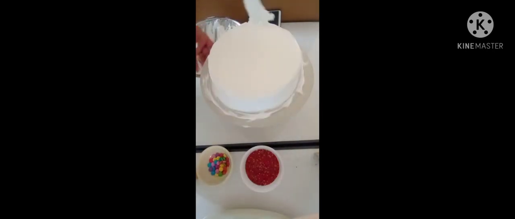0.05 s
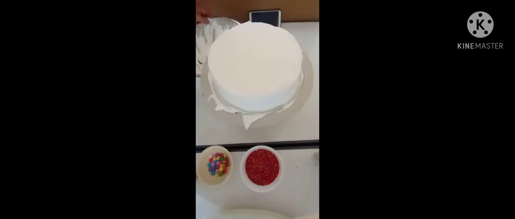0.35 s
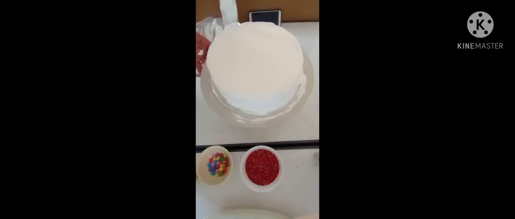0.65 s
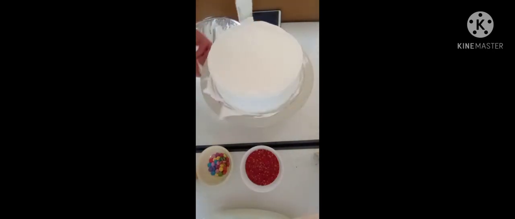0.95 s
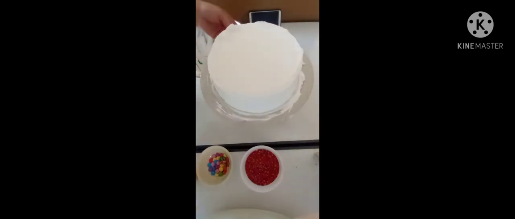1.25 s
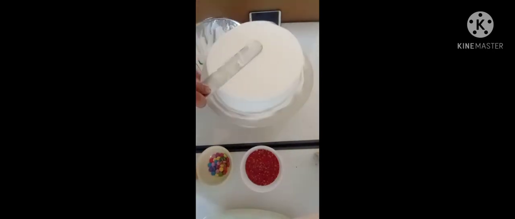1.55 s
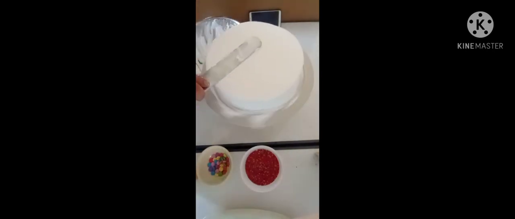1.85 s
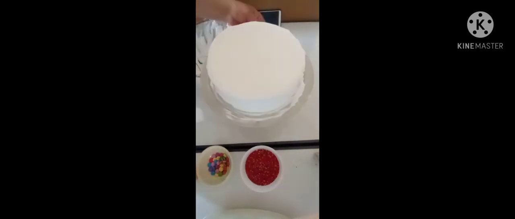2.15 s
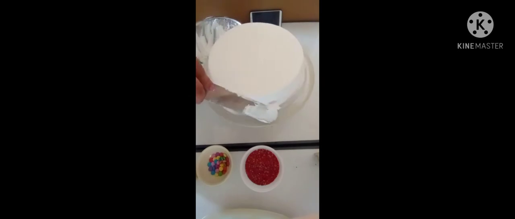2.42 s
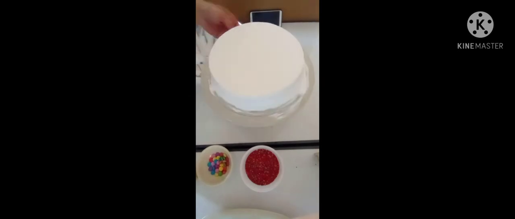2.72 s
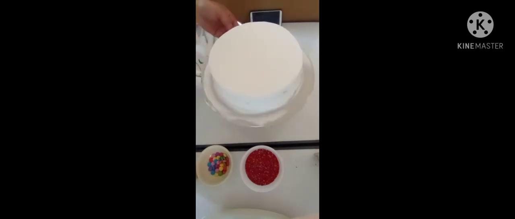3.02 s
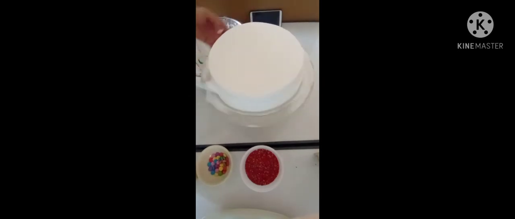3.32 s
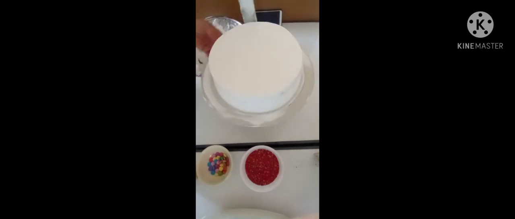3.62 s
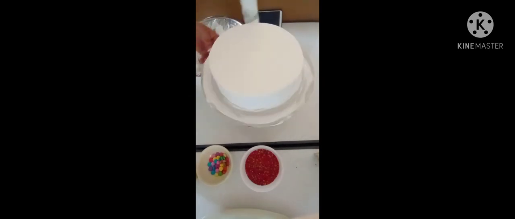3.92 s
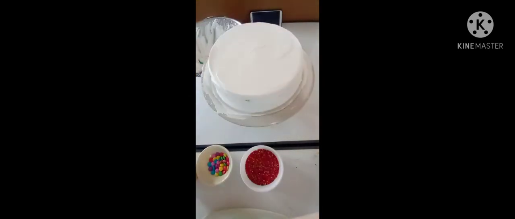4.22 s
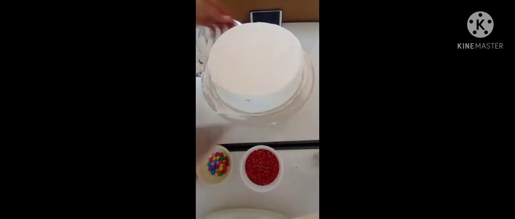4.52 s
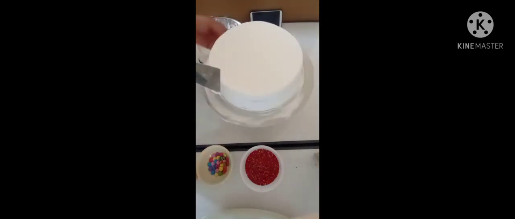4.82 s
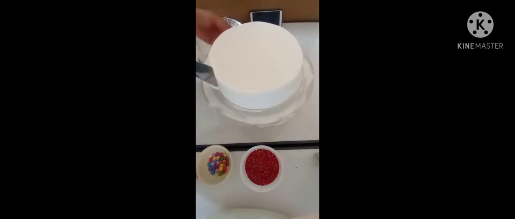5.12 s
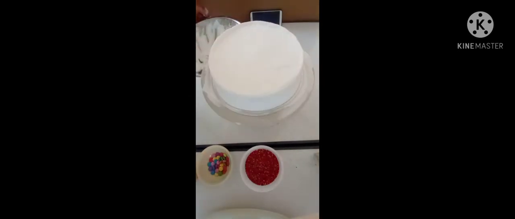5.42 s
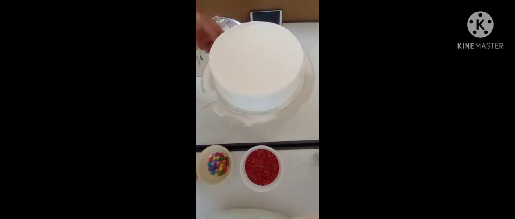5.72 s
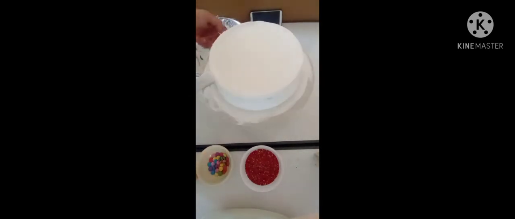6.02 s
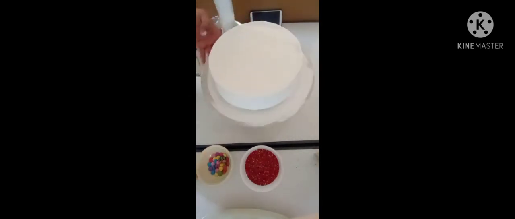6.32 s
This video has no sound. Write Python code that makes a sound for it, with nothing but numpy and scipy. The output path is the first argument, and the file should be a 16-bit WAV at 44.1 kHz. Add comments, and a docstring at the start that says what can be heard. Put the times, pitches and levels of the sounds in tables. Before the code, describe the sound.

Close to the microphone on a kitchen worktop, a metal spatula rubs and scrapes through cream, with light, irregular clicks against the cake plate and tiny squeaks. A quick run of dull knocks comes from the turning plate, then a short swish of foil. A longer, faintly singing scrape leads to a cluster of louder taps and some final scrapes. An appliance motor hums underneath the whole time.

```python
"""A kitchen appliance hums throughout while a steel spatula smooths cream on a cake turned by hand.
From the start the blade drags in tiny sticks and slips, with a brief squeak now and then,
and soon edges begin to tap the plate. At about 2.3 s the plate judders on its stand,
and near 2.9 s fingers brush some foil. From 4.6 s a scraper sings through one long pull;
a few more taps, strokes and squeaks end the scene."""
import sys
import numpy as np
from scipy import signal
from scipy.fft import rfft, irfft
from scipy.io import wavfile
from scipy.ndimage import uniform_filter1d

SR = 44100
rng = np.random.default_rng(int(sys.argv[2]) if len(sys.argv) > 2 else 0)


def transcribe(u):
    """Save the signal u as a 16-bit wav file named by the first command-line argument.

    u: samples, shape (n,) or (channels, n), limited to [-1, 1]; the rate is SR.
    q: integer samples, one column per channel.
    """
    v = np.clip(np.atleast_2d(u).T, -1, 1)
    q = np.round(v * 32767).astype(np.int16)
    wavfile.write(sys.argv[1], SR, q)


N = 289296
T = np.arange(N) / SR


def undb(db):
    """Turn decibels into a number to multiply by."""
    return 10 ** (np.asarray(db) / 20)


def unit(x):
    """Scale a sound to an average (rms) level of 1."""
    return x / np.sqrt(np.mean(x ** 2))


def wander(rate):
    """A smooth random drift, about 1 in size, that finds a new value `rate` times a second."""
    hold = max(int(SR / rate), 2)
    steps = np.repeat(rng.standard_normal(N // hold + 1), hold)
    return 1.25 * uniform_filter1d(uniform_filter1d(steps, hold), hold)[:N]


def band(x, lo_hz, hi_hz):
    """Keep the part of a sound between two pitches."""
    sos = signal.butter(3, [lo_hz, min(hi_hz, .48 * SR)], "band", fs=SR, output="sos")
    return signal.sosfilt(sos, x)


def ring(force, modes):
    """A force makes an object ring at its own pitches (modes); narrow ones ring longer."""
    return sum(undb(db) * signal.lfilter(*signal.iirpeak(hz, hz / width, fs=SR), force)
               for hz, width, db in modes)


def add(out, start_s, x):
    """Mix x into out at the given time."""
    start = max(int(start_s * SR), 0)
    out[start:start + len(x)] += x[:N - start]


# The motor's tones. Each row: pitch in Hz, level in dB.
MOTOR_TONES = [(394.9, -73), (801.5, -72), (924.6, -71.5), (1014, -81.5), (2369.6, -68.5), (2404, -65),
               (2766, -97), (3949.5, -76), (4344, -85), (4739, -72.5), (9873, -86), (10266, -88.5)]
# The rush of air before the housing colours it. Each row: pitch in Hz, level in dB per Hz.
AIR_RUSH = [(30, -115), (130, -116), (330, -114), (470, -107), (540, -100), (730, -100), (850, -97),
            (1100, -94.5), (1350, -102), (2100, -101), (2600, -99), (5000, -103), (7500, -108),
            (11000, -111), (15000, -120)]
# Where the housing lifts or lowers the rush. Each row: pitch in Hz, width in Hz, lift in dB.
HOUSING_MODES = [(547.6, 44, 10.5), (640, 43, 8), (860, 44, 4), (1040, 45, -0.5), (1180, 190, 0.5),
                 (1495, 10, 13.5), (1650, 49, -16), (1845, 110, 8.5), (2230, 180, 1), (2874, 180, 7.5),
                 (3500, 340, 1.5), (3970, 100, 4.5), (4650, 220, 2), (4900, 110, 0), (5500, 300, -1.5),
                 (5800, 310, 6.5), (6500, 180, 5.5)]


def appliance(waver_hz=2.117, flicker_db=1.0, swell_db=-0.17):
    """Motor tones waver a little in pitch and level, over a rush of air coloured by the housing."""
    tones = 0
    for hz, db in MOTOR_TONES:
        pitch = hz + waver_hz * np.sqrt(hz / 2400) * wander(25.01)
        peak = np.sqrt(2) * undb(db + flicker_db * wander(9))
        tones = tones + peak * np.sin(2 * np.pi * np.cumsum(pitch) / SR)
    air_hz, air_db = np.transpose(AIR_RUSH)
    freqs = np.maximum(np.arange(N // 2 + 1) * SR / N, 1)
    lift_db = sum(db / (1 + (2 * (freqs - hz) / width) ** 2) for hz, width, db in HOUSING_MODES)
    colour = undb(np.interp(np.log(freqs), np.log(air_hz), air_db) + lift_db) * np.sqrt(SR / 2)
    air = irfft(rfft(rng.standard_normal(N)) * colour, N)
    return tones + air * undb(swell_db * wander(5.57))


def pressure(start_s, length_s, swell_db, attack_s=0.017, release_s=0.06):
    """One movement of the hand: it presses on, leans in or eases off evenly, and lets go."""
    t = T - start_s
    touch = np.clip(t / attack_s, 0, 1) * np.clip(1 - (t - length_s) / release_s, 0, 1) ** 2
    return touch * undb(swell_db * (np.clip(t / length_s, 0, 1) - .5))


def friction(slips_per_s, spread_db, smooth_db, flutter_db):
    """An edge sticks and slips: tiny random jerks over a smooth rub, under a trembling hand."""
    slips = (rng.random(N) < slips_per_s / SR) * rng.standard_normal(N)
    slips *= undb(spread_db * np.minimum(rng.exponential(size=N), 4))
    smooth = undb(smooth_db) * rng.standard_normal(N)
    return (unit(slips) + smooth) * undb(flutter_db * wander(70))


def cream_pops(pops_per_s=34, jitter=.35, spread_db=3.5, fade_s=0.053):
    """Sticky cream catches the spatula and lets go in a loose row of small, uneven pops."""
    t = np.arange(SR // 10) / SR
    gaps, sizes = np.clip(rng.standard_normal((600, 2)), -2, 2).T
    starts = np.cumsum(np.exp(jitter * gaps) / pops_per_s)
    bursts = np.zeros(N)
    for start, size in zip(starts, undb(spread_db * sizes)):
        if start < T[-1]:
            add(bursts, start, size * undb(-60 * t / fade_s))
    return unit(bursts * rng.standard_normal(N))


# How the plate and its stand ring, rubbed or knocked. Each row: pitch in Hz, width in Hz, level in dB.
PLATE_MODES = [(557, 20.5, -4), (679, 25, -5.5), (850.6, 42, -2), (1026.4, 66, 4), (1140, 48, -3),
               (1237, 28.6, 3), (1350, 16, -43)]
# How the blade rings when pressed on the plate. Each row: pitch in Hz, width in Hz, level in dB.
PRESSED_BLADE_MODES = [(1550, 53, -2.5), (2112, 148, 1.5), (2492, 30, -1), (2880, 59, -12.5),
                       (3152, 38, -3), (3594, 200, -8), (4280, 150, -14), (4810, 300, -13.5),
                       (5450, 31, -3.5), (5860, 85, -6), (6530, 87, -9), (7230, 240, -9.5),
                       (7970, 350, -12.5), (8500, 37, -8), (9350, 120, -7), (10300, 100, -11.5),
                       (10370, 170, -10.5), (10850, 720, -18), (12100, 390, -21), (13000, 1300, -22),
                       (15200, 500, -21)]
# Spatula strokes and turns of the plate. Each row: start in seconds, length in seconds,
# strength of rumble, of scrape and of grit in dB before mixing, swell from start to end in dB.
SPATULA_STROKES = [(0.0, 0.07, -62, -51.5, -58, -0.5), (0.115, 0.038, -58.5, -55, -56.5, -2),
                   (0.39, .09, -70, -74, -68.5, 2), (0.616, 0.046, -60.5, -55.5, -62.5, -5),
                   (0.721, 0.307, -61, -57.5, -62, 4.5), (1.13, 0.13, -70, -69, -69, 5),
                   (1.376, 0.46, -63, -69.5, -76, -1.5), (1.823, .22, -61, -64, -73, -3.5),
                   (2.248, 0.17, -55, -63.5, -80, -4), (2.43, 0.28, -60, -62, -74, -2.5),
                   (2.894, 0.12, -62, -66, -63, 4), (3.23, 0.17, -66, -60.5, -62, 5.5),
                   (3.526, 0.11, -73, -63, -70, -1), (3.673, 0.045, -59.5, -54, -59, 0),
                   (3.764, 0.148, -65.5, -54, -59.5, 2), (3.96, 0.033, -62, -53, -59.5, -2),
                   (4.135, .04, -68, -72, -63, -10), (4.476, 0.057, -70, -64.5, -68, -3),
                   (4.603, 0.74, -58, -55.5, -62, -0.5), (5.607, .13, -63, -73, -70, -9),
                   (5.896, 0.55, -69.5, -68, -72, 1), (6.282, 0.082, -65, -56.5, -62, -3),
                   (6.386, 0.12, -59, -54.5, -62.5, -9)]


def strokes(resting_db=-75, full_catch_db=-55):
    """Dragging makes the plate rumble, the pressed blade scrape and its edge hiss with grit."""
    levels = np.full((3, N), undb(resting_db))  # the blade never quite stops rubbing
    for start, length, *parts_db, swell_db in SPATULA_STROKES:
        levels = np.maximum(levels, np.outer(undb(parts_db), pressure(start, length, swell_db)))
    rumble, scrape, grit = levels
    drag = friction(slips_per_s=900, spread_db=2, smooth_db=2, flutter_db=.6)
    glide = unit(friction(slips_per_s=3000, spread_db=2.4, smooth_db=0, flutter_db=.6))
    # Firm dabs catch in the cream and crackle; light rubs and the scraper's pull (below) run evenly.
    pulling = sum(pressure(start, length, 0) for start, length, _, _ in SCRAPER_PULLS)
    catch = np.minimum(scrape / undb(full_catch_db), 1) * (1 - pulling)
    crackle = cream_pops()
    sticky = unit(glide * undb(1.6 * wander(260)) + undb(-1) * crackle)
    edge = (1 - catch) * glide + catch * sticky
    steel = ring(edge, PRESSED_BLADE_MODES) + undb(-23.5) * edge
    spray = catch * undb(-5) * unit(band(crackle, 3500, 16000))
    return (undb(3.5) * rumble * unit(band(ring(drag, PLATE_MODES), 640, 2500))
            + scrape * unit(band(steel, 1460, 6670))
            + grit * (undb(-1) * unit(band(steel, 5900, 20000)) + spray))


# Squeaks of blade and plate, and a few short flicks of bright treble that go with taps. Each row: start in
# seconds, length in seconds, pitch in Hz, # width in Hz, level in dB.
SQUEAKS_AND_FLICKS = [(0.009, .055, 13800, 3600, -54), (0.118, .045, 13800, 3600, -56.5),
                      (0.74, 0.1, 1142, 60, -63), (0.8, 0.056, 833, 50, -67), (0.931, 0.069, 640, 90, -62.5),
                      (1.105, 0.12, 550, 80, -68), (1.266, 0.021, 8460, 1500, -47.5),
                      (2.647, 0.012, 14100, 1800, -54), (2.673, 0.0076, 14400, 1800, -50),
                      (2.69, 0.035, 14300, 1900, -50), (2.734, 0.028, 4150, 500, -61),
                      (2.952, 0.031, 6000, 700, -56), (3.02, 0.033, 13900, 1600, -51),
                      (4.405, 0.032, 4160, 700, -48), (5.492, .02, 9770, 500, -41), (5.501, 0.013, 5730, 250, -35),
                      (5.502, 0.014, 4140, 250, -43), (5.92, 0.03, 6150, 300, -67.5),
                      (6.062, 0.026, 5530, 400, -62.5), (6.061, 0.024, 8950, 1800, -63.5),
                      (6.165, 0.08, 663, 50, -67.5), (6.296, 0.028, 2015, 120, -61)]


def squeaks():
    """Brief rubs and flicks of treble swell and fade, each around a single pitch."""
    out = np.zeros(N)
    for start, length, hz, width, db in SQUEAKS_AND_FLICKS:
        count = int(length * SR)
        rub = band(rng.standard_normal(SR // 2), hz - width / 2, hz + width / 2)[-count:]
        add(out, start, undb(db) * unit(rub * np.hanning(len(rub))))
    return out


def blow_level(x, db):
    """Set a blow's average (rms) level over its first 20 ms."""
    return x * undb(db) / np.sqrt(np.mean(x[:SR // 50] ** 2))


def contact(hold_s, fade_s, snap, echo_db, echo_s):
    """The force of one blow: a snap, chatter while the edge touches, echoes from worktop and walls."""
    t = np.arange(SR // 5) / SR
    chatter = undb(-60 * np.maximum(t - hold_s, 0) / fade_s)
    echoes = undb(echo_db - 60 * t / echo_s)
    force = (chatter + echoes) * rng.standard_normal(len(t))
    force[0] += snap
    return force


def plate_knock(hold_s, main_hz=1014, main_fade_s=0.045, full_hold_s=0.0076):
    """A short touch wakes all the plate's pitches; a lingering edge builds up its main note."""
    push = contact(hold_s, fade_s=0.027, snap=16 * np.exp(-hold_s / 0.0059), echo_db=-14, echo_s=0.081)
    thud = undb(-27.5) * band(push, 14, 224) + ring(push, [(202, 78, -25)])  # the worktop gives a little
    body = blow_level(band(ring(push, PLATE_MODES), 557, 2120) + thud, 0)
    t = np.arange(len(push)) / SR
    swell = np.minimum(t / hold_s, 1) * undb(-60 * np.maximum(t - hold_s, 0) / main_fade_s)
    main_note = blow_level(swell * np.sin(2 * np.pi * main_hz * t), 0)
    return body + undb(7.5) * min(hold_s / full_hold_s, 1) ** 2 * main_note


# How the blade rings when struck. Each row: pitch in Hz, width in Hz, level in dB.
STRUCK_BLADE_MODES = [(1885, 66, 8), (2310, 110, 2.5), (2420, 57, -3), (2962, 103, 6), (3615, 900, 1.5),
                      (4150, 130, -12.5), (4480, 110, 0), (5356, 290, 1.5), (5660, 92, 8), (6130, 330, 0.5),
                      (7000, 300, -2.5), (7750, 310, -2.5), (8550, 330, -1), (9450, 99, -16),
                      (10660, 390, -16), (11930, 200, -5), (14000, 410, -12.5), (13800, 540, -12),
                      (15060, 410, -3)]
# A thin, longer ring at the very top of each tap. Each row: pitch in Hz, width in Hz, level in dB.
THIN_RING = [(15300, 45, 9)]
# Taps of blade, fingers and plate. Each row: start in seconds, touching time in seconds,
# plate knock in dB, middle of the blade's ring in dB, brightness in dB.
EDGE_TAPS = [(0.2754, .0007, -47.5, -52.5, -3.5), (0.332, 0.0051, -47.5, -40, 4),
             (0.3754, 0.0043, -57, -48.5, 8), (0.7176, 0.0027, -57, -58, -3),
             (0.7932, 0.0019, -56.5, -56, -2), (0.838, .0038, -54, -61, 14), (0.9008, .0044, -58, -60, -7),
             (1.2028, 0.0036, -47.5, -49.5, 3.5), (1.2717, .0017, -49.5, -46.5, 8),
             (1.414, 0.0033, -54.5, -67, 0), (1.5932, 0.0017, -48, -74, 0), (1.617, 0.0038, -51.5, -83, -8),
             (1.734, 0.0033, -51, -65, 3), (2.1153, 0.0027, -51.5, -46.5, 3.5),
             (2.1391, 0.004, -49, -58.5, 6), (2.7718, 0.00061, -41.5, -47, 4),
             (2.88, 0.0063, -56, -56.5, 8), (2.933, 0.0015, -53.5, -57, 1), (2.9913, 0.00088, -51, -59, -2),
             (3.084, 0.0035, -51.5, -47, 4.5), (3.103, 0.0044, -61, -53.5, 20),
             (3.1507, 0.00079, -43, -53, -6), (3.2097, .003, -56.5, -54.5, 2), (3.4794, .0006, -48, -58, 3),
             (3.5806, 0.0025, -55, -65, -5), (3.6792, 0.0093, -60, -59.5, -8),
             (3.7529, 0.00047, -56, -53.5, -3.5), (3.9457, 0.00088, -54.5, -51.5, -3),
             (4.091, 0.00096, -52.5, -42, 5), (4.4115, 0.0072, -39.5, -45.5, -4.5),
             (4.436, .0058, -78, -52.5, -2), (4.452, 0.0062, -54, -50, 0),
             (4.613, 0.0026, -50.5, -53.5, -5.5), (5.041, 0.0038, -58, -54.5, -3),
             (5.4066, 0.0067, -51.5, -74, -8), (5.425, 0.0052, -38, -43.5, -1.5),
             (5.4893, .001, -63, -44, 12), (5.502, 0.0059, -40.5, -35, 5), (5.5722, .0079, -53.5, -49, 4),
             (5.6644, 0.0039, -46, -43.5, 0), (6.139, 0.0039, -48, -47.5, 3),
             (6.162, 0.0024, -51, -60.5, -10)]


def taps(clack_db=-5, tick_db=-3, tick_share=0.21):
    """Each tap knocks the plate and rings the blade; a brighter one has less low clack, more high tick."""
    out = np.zeros(N)
    for start, hold_s, knock_db, ring_db, bright_db in EDGE_TAPS:
        snap = 10 * np.exp(-hold_s / 0.0009)
        edge = contact(hold_s, fade_s=0.048, snap=snap, echo_db=-12.5, echo_s=0.12)
        steel = ring(edge, STRUCK_BLADE_MODES) + ring(edge, THIN_RING) + undb(-22) * edge
        knock = blow_level(plate_knock(hold_s), knock_db)
        clack = blow_level(band(steel, 1720, 4920), ring_db + clack_db - bright_db)
        middle = blow_level(band(steel, 4500, 9200), ring_db)
        tick = blow_level(band(steel, 8400, 14860), ring_db + tick_db + tick_share * bright_db)
        add(out, start, knock + clack + middle + tick)
    return out


# How the stand rings when the plate jumps. Each row: pitch in Hz, width in Hz, level in dB.
STAND_MODES = [(830, 120, 5), (993, 65, 12.5), (1180, 55, 3), (1400, 160, 2), (1590, 120, -4),
               (1975, 96, 10), (2460, 140, -25), (3220, 400, -35)]
# The plate's jumps. Each row: start in seconds, level in dB.
PLATE_JUMPS = [(2.268, -44.5), (2.277, -48), (2.2925, -47), (2.3101, -46.5), (2.3182, -42.5), (2.337, -53),
               (2.34, -49)]


def judder():
    """The turning plate sticks and jumps on its stand in short, dull knocks."""
    out = np.zeros(N)
    for start, db in PLATE_JUMPS:
        push = contact(hold_s=.0025, fade_s=.007, snap=8, echo_db=-24, echo_s=.12)
        stand = band(ring(push, STAND_MODES), 520, 3000)
        thud = undb(-22) * band(push, 20, 95)
        add(out, start, blow_level(stand + thud + undb(-28.5) * push, db))
    return out


# How the foil rings. Each row: pitch in Hz, width in Hz, level in dB.
FOIL_MODES = [(5600, 450, -1), (6050, 300, -3), (6340, 200, -5), (9850, 720, -5), (11000, 570, -7),
              (11900, 650, -4), (14100, 700, -9), (14900, 360, 3.5)]
# Touches on the foil. Each row: start in seconds, length in seconds, level in dB, swell in dB.
FOIL_BRUSHES = [(2.886, 0.035, -48.5, 8), (2.936, .09, -51, 0)]


def foil():
    """Fingers brush the foil, and its tiny crinkles make a bright swish."""
    crinkle = friction(slips_per_s=4300, spread_db=2, smooth_db=3, flutter_db=4)
    touch = sum(undb(db) * pressure(start, length, swell) for start, length, db, swell in FOIL_BRUSHES)
    return touch * unit(band(ring(crinkle, FOIL_MODES), 6100, 18000))


# How the scraper's edge rings. Each row: pitch in Hz, width in Hz, weight in the mix in dB.
EDGE_MODES = [(8400, 220, -14), (8400, 150, -11), (9200, 110, -11), (9630, 290, -1), (10300, 75, 3)]
# The touching point's path along the edge. Each row: time in seconds, pitch it favours in Hz.
CONTACT_SLIDE = [(4.76, 9600), (5.04, 8400), (5.15, 8700), (5.25, 10200)]
# The long pull. Each row: start in seconds, length in seconds, edge level in dB, swell in dB.
SCRAPER_PULLS = [(4.6, .73, -65.5, -14)]


def scraper(sheet_db=-58, hiss_db=-8):
    """The touching point slides along the edge and picks out pitches; the sheet's lowest note holds."""
    favoured_hz = np.interp(T, *np.transpose(CONTACT_SLIDE))
    rub = friction(slips_per_s=5200, spread_db=4.5, smooth_db=6, flutter_db=2)
    weights = np.array([undb(db) / (1 + ((favoured_hz - hz) / 600) ** 2) for hz, _, db in EDGE_MODES])
    notes = np.array([unit(band(ring(rub, [(hz, width, 0)]), 7000, 10200))
                      for hz, width, _ in EDGE_MODES])
    edge = np.sum(weights * notes, axis=0) / np.sqrt(np.sum(weights ** 2, axis=0))
    sheet = undb(sheet_db) * unit(band(ring(rub, [(2476, 60, 0)]), 2450, 2480))
    hiss = undb(hiss_db) * unit(band(rub, 11500, 17000))  # cream hisses out from under the edge
    out = np.zeros(N)
    for start, length, db, swell_db in SCRAPER_PULLS:
        out += undb(db) * pressure(start, length, swell_db) * (edge + hiss)
        out += pressure(start, length, 0) * sheet
    return out


def scene():
    """Everything is close to one microphone above the worktop."""
    return (taps() + judder() + strokes() + scraper() + foil() + squeaks() + appliance())[None]


def record(dry):
    """Cut away the very highest treble."""
    top_hz = 15480
    return signal.sosfilt(signal.ellip(10, .2, 70, top_hz, fs=SR, output="sos"), dry)


dry = scene()
out = record(dry)
transcribe(out)
```